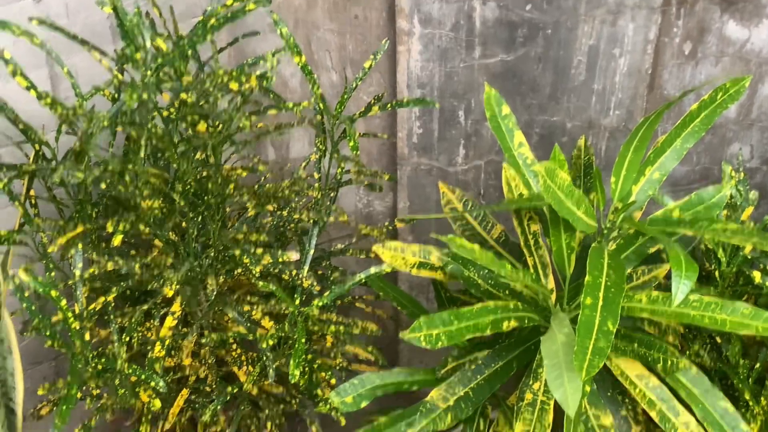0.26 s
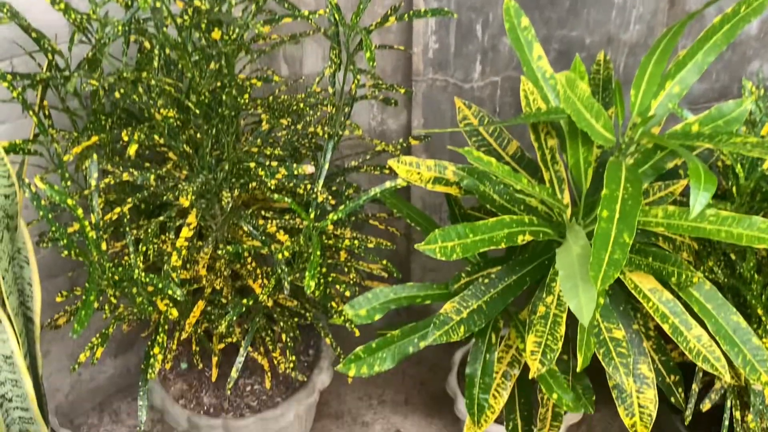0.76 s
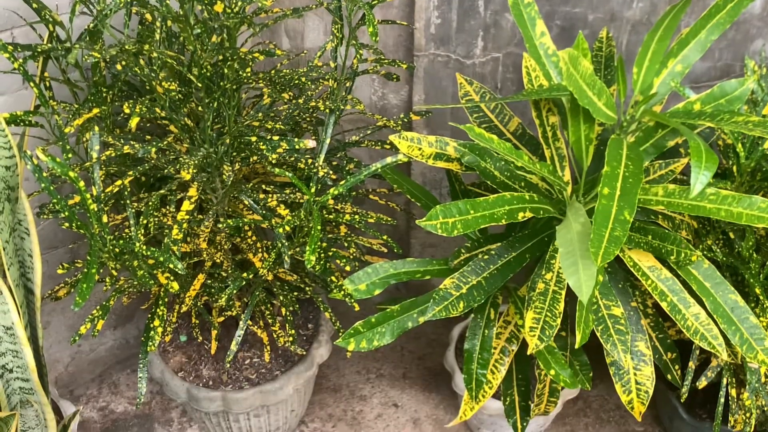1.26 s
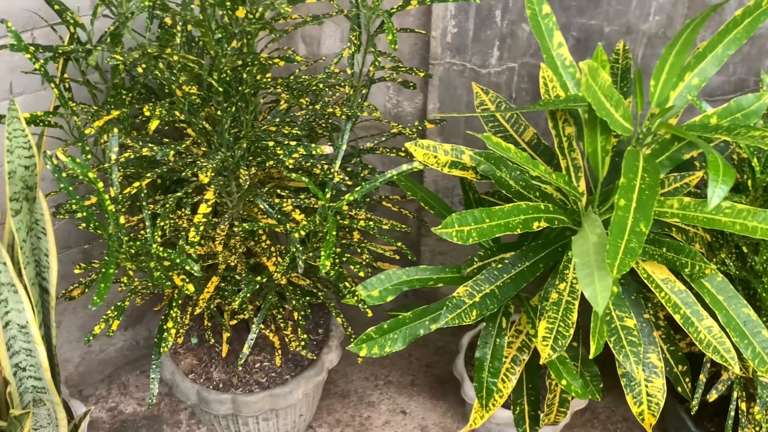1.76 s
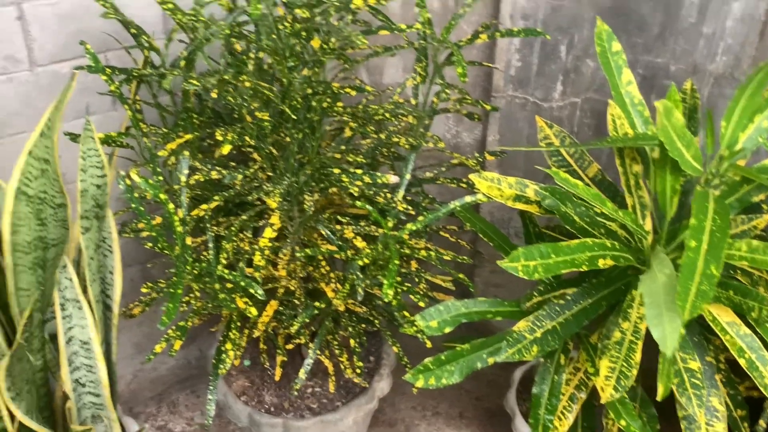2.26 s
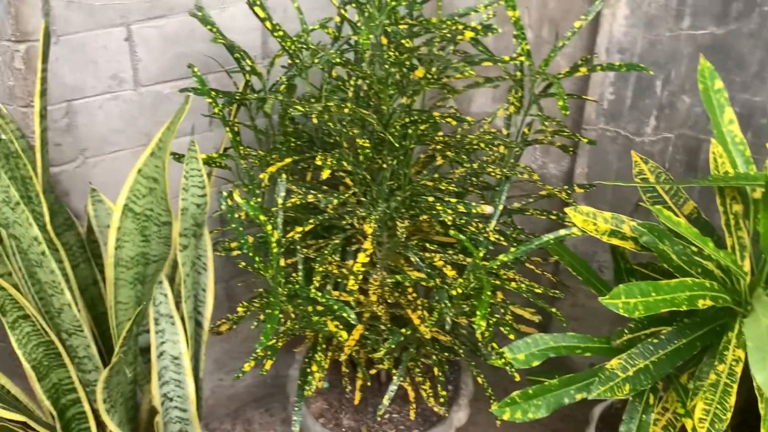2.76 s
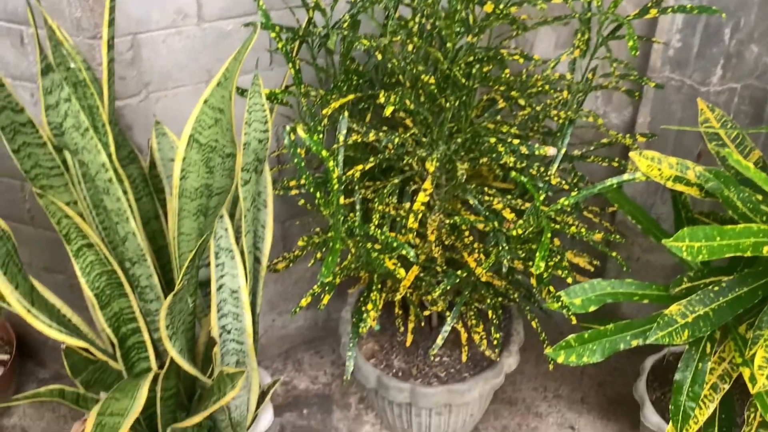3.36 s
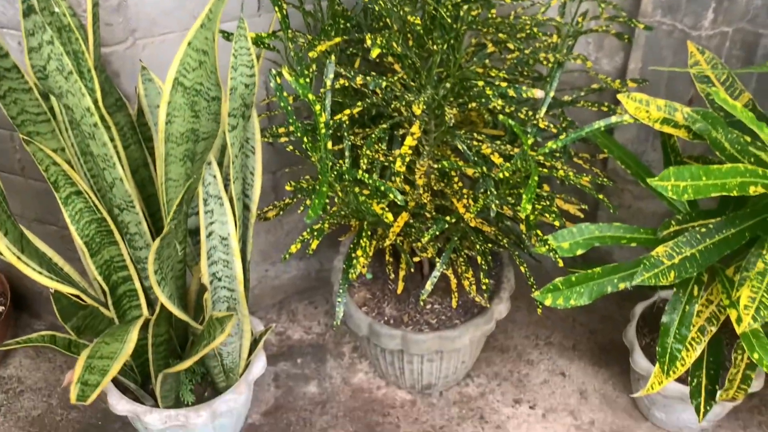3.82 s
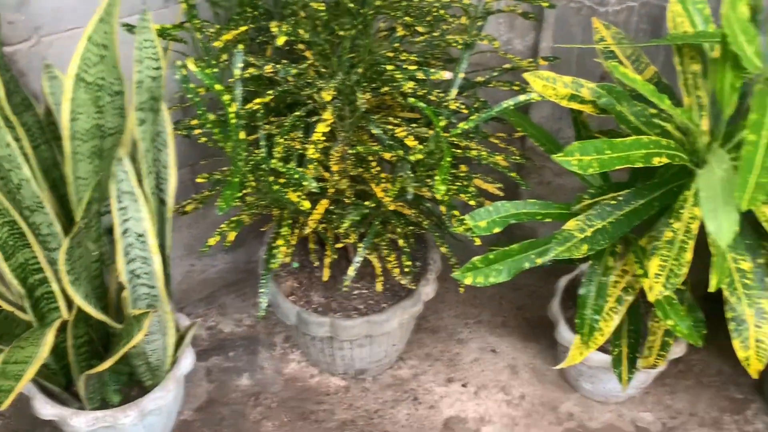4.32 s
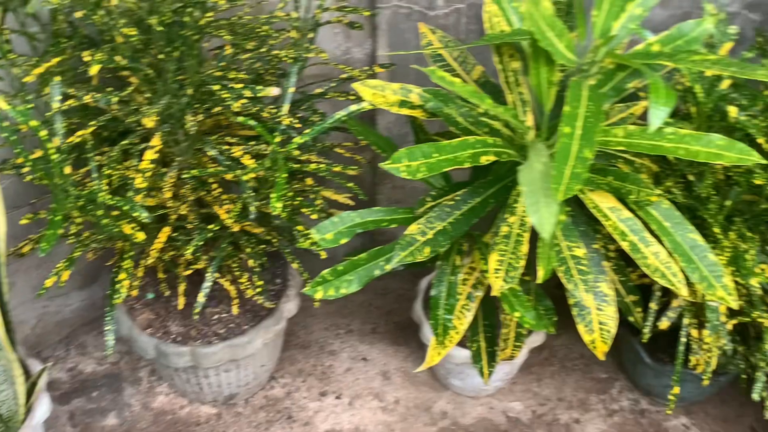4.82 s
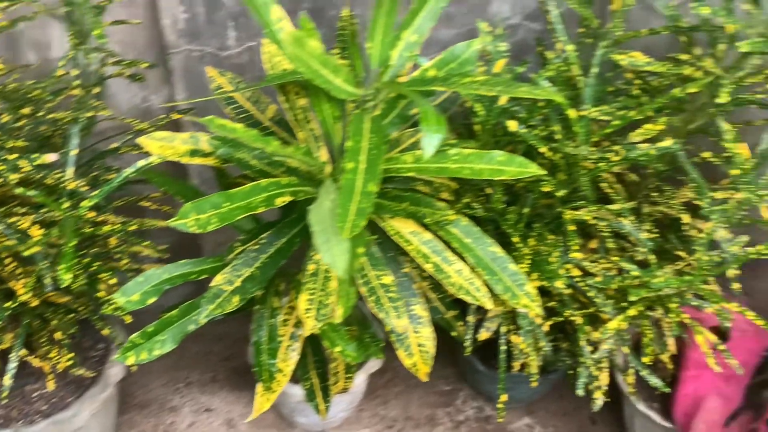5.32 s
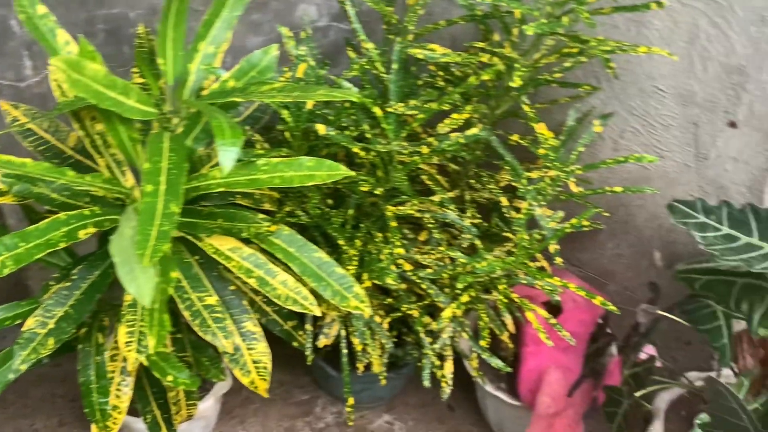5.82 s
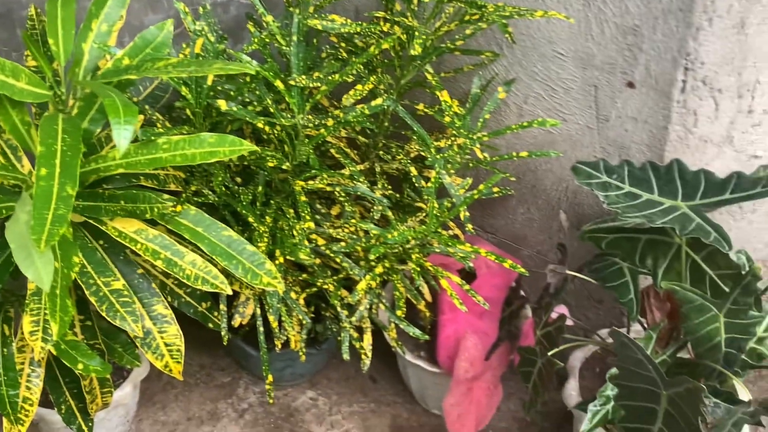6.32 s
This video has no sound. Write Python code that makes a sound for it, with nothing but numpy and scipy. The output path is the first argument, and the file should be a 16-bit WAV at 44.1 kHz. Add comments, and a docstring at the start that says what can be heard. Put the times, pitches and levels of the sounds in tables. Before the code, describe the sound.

Close outdoor perspective beside a wall and plants. Rain pours steadily, with countless small plops and light ticks. Heavy drops strike very near, each a sharp slap, hollow knock, short ping and falling low thud, some scattering droplets. The loudest briefly duck the rain. Later hits are fewer and softer, leaving mostly patter.

```python
"""A yard in heavy rain, heard from beside a wall with potted plants.
Far rain is a wash of shaped noise; nearer drops are short rings that patter on leaves and paving.
Light drops tick as brief bursts of noise. Big drips land right by the microphone, some splattering
into fragments: a sharp slap, a knock and ping, a falling thud and scattered droplets.
A limiter briefly turns everything down at the loud hits, so they duck the rain."""
import sys
import numpy as np
from scipy import signal
from scipy.fft import rfft, irfft
from scipy.io import wavfile
from scipy.ndimage import uniform_filter1d, minimum_filter1d

SR = 44100
rng = np.random.default_rng(int(sys.argv[2]) if len(sys.argv) > 2 else 0)


def to_wav(sig):
    """Store sig (one row per channel, or 1-D mono) as 16-bit WAV at the path in sys.argv[1].

    Samples outside -1..1 are clipped; the rate is SR.
    """
    pcm = np.clip(np.atleast_2d(sig), -1, 1) * 32767
    pcm = np.round(pcm).astype(np.int16)
    wavfile.write(sys.argv[1], SR, pcm.T)  # frames by channels


N = 290173  # length in samples


def amp(db):
    """Turns decibels into gain."""
    return 10 ** (np.asarray(db) / 20)


def unit(x):
    """Scales a sound to rms 1."""
    return x / np.sqrt(np.mean(x ** 2) + 1e-20)


def colour(points, hz):
    """Reads the gain at each pitch from a colour table, joined on a log-frequency axis."""
    point_hz, point_db = np.transpose(points)
    return amp(np.interp(np.log(hz + 1), np.log(point_hz), point_db))


def shaped(x, points):
    """Gives a sound the colour of a table, at rms 1."""
    gain = colour(points, np.fft.rfftfreq(N, 1 / SR))
    return unit(irfft(rfft(x) * gain, N))


def add(mix, start_s, sound):
    """Mixes a sound in at a given time."""
    start = max(round(start_s * SR), 0)
    part = mix[start:][:len(sound)]
    part += sound[:len(part)]


def resonance(hz, centre_hz, q):
    """Frequency response of one damped resonance, gain 1 at its centre."""
    return 1 / (1 + 1j * q * (hz / centre_hz - centre_hz / (hz + 1e-6)))


# How strong the rain is over time: time_s, level_db
RAIN_STRENGTH = [(0.0, -34), (0.24, -33.5), (0.62, -32), (1.67, -34), (2.36, -34), (2.95, -35), (4.31, -41),
                 (5.0, -39.5), (5.44, -39.5), (6.58, -36)]


def rain_db(s):
    """Strength of the rain at time s; wash, hiss and stray light drops all follow it."""
    return np.interp(s, *np.transpose(RAIN_STRENGTH))


def patter(per_s, spread_db, low_hz, high_hz, cycles, count=28):
    """Countless drops of random size, each a short ring at the pitch of the spot it hits."""
    chance = rng.random(N)
    size = np.minimum(rng.exponential(1, N), 5)
    spot = rng.integers(0, count, N)
    hits = (chance < per_s / SR) * amp(spread_db * size) * rng.choice([-1, 1], N)
    t, out = np.arange(512) / SR, np.zeros(N)
    for k, hz in enumerate(np.geomspace(low_hz, high_hz, count)):
        ring = np.sin(2 * np.pi * hz * t) * np.exp(-hz * t / cycles)  # fades over the given cycles
        out += signal.oaconvolve(hits * (spot == k), unit(ring))[:N]
    return unit(out)


# Colour of the low wash of rain: pitch_hz, level_db (per Hz, relative)
WASH_COLOUR = [(25, -19), (45, 3), (80, -2.5), (150, -3.5), (260, -3.5), (450, 0.5), (830, -1.5),
               (1150, -4.5), (1600, -7), (2200, -3.5), (2700, -10.5), (3400, -14), (4600, -27.5),
               (7000, -43)]
# Colour of the high hiss of rain: pitch_hz, level_db (per Hz, relative)
HISS_COLOUR = [(1500, -8.5), (3000, 1), (4000, 5.5), (4800, -1), (5700, 2.5), (7200, -2.5), (8400, -11.5),
               (9500, -20), (10500, -8.5), (11500, -15.5), (13500, -21), (15500, -49), (16500, -36)]


def rain(wash_db=-0.45, hiss_db=-16.5, plops_db=-5, fizz_db=-4, ticks_db=-38):
    """Far drops merge into noise; nearer ones are plops on the ground, fizz and fine ticks on leaves."""
    far_wash, far_hiss = rng.standard_normal((2, N))
    plops = patter(per_s=1000, spread_db=3.0, low_hz=780, high_hz=4420, cycles=2.9)
    fizz = patter(per_s=890, spread_db=1.5, low_hz=5470, high_hz=15000, cycles=0.47)
    ticks = patter(per_s=70, spread_db=2.5, low_hz=11000, high_hz=15600, cycles=2.4, count=10)
    wash = unit(shaped(far_wash, WASH_COLOUR) + amp(plops_db) * shaped(plops, WASH_COLOUR))
    hiss = unit(shaped(far_hiss, HISS_COLOUR) + amp(fizz_db) * shaped(fizz, HISS_COLOUR))
    layers = amp(wash_db) * wash + amp(hiss_db) * hiss + amp(ticks_db) * ticks
    return amp(rain_db(np.arange(N) / SR)) * layers


# Stray light drops: how often, level relative to the rain, and range of pitch
TAPS_PER_S, TAP_DB, TAP_SPREAD_DB = 18, -11.5, 1
TAP_LOW_HZ, TAP_HIGH_HZ = 3000, 6000


def stray_taps(count=200):
    """Light drops at random moments, levels and pitches: rows of start_s, level_db, centre_hz."""
    wait, weight, spot = rng.random((count, 3)).T
    start_s = np.cumsum(-np.log(1 - wait)) / TAPS_PER_S  # random waits, as in steady rain
    level_db = rain_db(start_s) + TAP_DB + TAP_SPREAD_DB * (2 * weight - 1)
    centre_hz = TAP_LOW_HZ * (TAP_HIGH_HZ / TAP_LOW_HZ) ** spot
    return [row for row in zip(start_s, level_db, centre_hz) if row[0] < N / SR]


# Ticks of light drops; those near 13 kHz are the treble tick of a big drip:
# start_s, level_db (before the level shared by all taps), centre_hz
TIMED_TAPS = [(.1825, -44, 13200), (.572, -40, 5000), (0.7317, -22.5, 5770), (.8593, -25.5, 3800),
              (0.9377, -39.5, 4060), (1.106, -31, 13100), (1.328, -39, 5760), (1.6715, -41, 6400),
              (2.015, -43, 7000), (2.201, -46, 7000), (2.744, -43, 6400), (4.5376, -49, 8450),
              (4.9968, -38, 4000), (6.399, -47, 8400)]


def taps(level_db=-1, snap_s=0.0017, spray_db=-19, spray_s=0.027, octaves=0.53, size=2048):
    """A tick snaps and leaves a little spray: one burst of noise with a fast and a slow fade."""
    out, t, hz = np.zeros(N), np.arange(size) / SR, np.fft.rfftfreq(size, 1 / SR)
    for start_s, tap_db, centre_hz in TIMED_TAPS + stray_taps():
        octaves_away = np.log2((hz + 1) / centre_hz)
        band = np.exp(-.5 * (octaves_away / octaves) ** 2) / (1 + hz / centre_hz)
        noise = irfft(rfft(rng.standard_normal(size)) * band)
        tap = noise * (np.exp(-t / snap_s) + amp(spray_db) * np.exp(-t / spray_s))
        first_moment = tap[:size // 32].std()  # the level is set on the snap
        add(out, start_s, amp(tap_db + level_db) * tap / first_moment)
    return out


def droplets(hz, fade_s, gap_s=.0034, spread_db=4, click_db=-1, click_hz=2500, click_q=0.086,
             click_fade=0.64, plop_db=6.0, plop_hz=720, plop_octaves=1.0, plop_q=3.3, count=10):
    """Spectrum of the droplets after a splash: each clicks and plops, and the clicks die away sooner."""
    when, weight, side, spot = rng.random((count, 4)).T[:, :, None]
    delay_s = np.maximum(np.arange(count)[:, None] + when - .5, 0) * gap_s
    sizes = np.sign(side - .5) * amp(spread_db * (2 * weight - 2.5))
    click_level = amp(click_db) * np.exp(-delay_s / fade_s / click_fade)
    click = click_level * resonance(hz, click_hz, click_q)
    spot_hz = plop_hz * 2 ** (plop_octaves * (2 * spot - 1))
    plop = amp(plop_db) * np.exp(-delay_s / fade_s) * resonance(hz, spot_hz, plop_q)
    return (sizes * (click + plop) * np.exp(-2j * np.pi * delay_s * hz)).sum(0)


SLAP_HZ, SLAP_DB_PER_OCTAVE = 4000, 9  # brightness of a 0 dB slap; a harder one is duller
SLAP_LOW_HZ = 186  # a slap is too brief to carry bass
THUD_LAG_CYCLES = 0.689  # the thud follows the slap by this share of its own period
SPRAY_FADE_S = 0.025  # how long a 0 dB spray lingers; a weaker one ends sooner
# each hit lands in two parts: size and range of delay of the second
SECOND_SHARE, SECOND_EARLY_S, SECOND_LATE_S = 0.29, 0.001166, 0.00407

# Colour shared by all big drips: pitch_hz, level_db (relative)
SPLASH_COLOUR = [(25, 0), (60, -1), (140, -0.85), (200, 4), (700, -5.5), (1300, -8.5), (2100, -9),
                 (3300, -13.5), (4700, -22), (5800, -17.5), (7200, -23), (9000, -32.5), (10500, -26.5),
                 (15000, -36.5)]
# Big drips, and the fragments of two that splatter; each row has its own thud, knock and ping.
# Levels are before the shared colour and level:
# start_s, slap_db, thud_db, thud_hz, knock_db, knock_hz, ping_db, ping_hz, spray_db
BIG_DRIPS = [ (0.183, -15, -9, 310, 3, 514, 3, 770, -14), (0.5217, -8.5, -28, 500, -8, 1160, 4.5, 7000, -6),
             (0.5312, -15.5, -10, 350, 0.5, 790, -10, 2400, -8),
             (0.5467, -29, -5.5, 375, -1, 766, -22, 1500, -7),
             (0.6621, -10, -12, 506, 4.5, 850, 8, 2240, -17),
             (0.6677, -5, 1, 326, 3.5, 1220, 1.5, 6200, -7),
             (0.6798, -17, -1, 380, -1, 810, -13, 3200, -18),
             (0.7119, 4, 23.5, 171, 17.5, 780, 17, 2030, -3),
             (0.9281, -18, -29, 600, -10, 1700, -13, 3150, -16),
             (0.9524, -23, -5.5, 283, -2.5, 445, 4.5, 870, -35),
             (1.1028, 4.5, 9, 310, -6, 455, 9.5, 1930, -7.5), (1.1723, 3, 15, 179, 10, 705, 11.5, 1810, -9),
             (1.6304, 6, 17, 189, 13.5, 644, 17.5, 3060, -31),
             (2.1315, 7, 15, 124, 9.5, 665, 11, 3000, -9.5),
             (2.428, -36, -13.5, 195, -28, 302, -11, 2210, -36),
             (2.653, 11, 21.5, 248, 21, 776, 15.5, 2020, -38),
             (3.202, 21.5, 9.5, 245, 17, 655, 4.5, 2340, -44),
             (3.7616, -9.5, 5, 264, 10.5, 570, -7, 1060, -32),
             (3.836, 22, 11.5, 283, 25.5, 570, 12, 1000, -48),
             (3.9505, -28, -24, 605, -4, 480, -8.5, 990, -40),
             (4.2482, -25, 6.5, 101.6, 1, 272, -3.5, 725, -35),
             (4.7245, -21.5, 13.5, 103, 8, 310, -0.5, 880, -26),
             (5.1556, 0, 12, 117.7, -8, 740, -0.5, 1940, -23),
             (5.506, -41, -35, 500, -30, 550, -11.5, 1130, -43)]


def drips(level_db=26, sweep_turns=1.2, sweep_end_hz=11.4, boom_hz=97, boom=0.69, boom_q=2.9,
          knock_q=3.35, ping_q=6.0, thud_q=0.53, echo=0.19, echo_s=0.00093, size=8192):
    """First contact slaps, the spot knocks and pings, the bulk of the water thuds, droplets scatter."""
    out, hz = np.zeros(N), np.fft.rfftfreq(size, 1 / SR)
    lead_s = .008  # room before the hit
    # low notes arrive last, after sweep_turns / (hz + sweep_end_hz) seconds,
    # so each hit sweeps down into a short boom
    sweep = np.exp(-2j * np.pi * (sweep_turns * np.log(1 + hz / sweep_end_hz) + hz * lead_s))
    boomy = 1 + boom * resonance(hz, boom_hz, boom_q)
    body = amp(level_db) * colour(SPLASH_COLOUR, hz) * sweep * boomy
    # a quick echo off the wall follows the thud and hollows out its colour
    wall_echo = (1 + echo * np.exp(-2j * np.pi * hz * echo_s)) / (1 + echo / 2)
    for start_s, slap_db, thud_db, thud_hz, knock_db, knock_hz, ping_db, ping_hz, spray_db in BIG_DRIPS:
        bright_hz = SLAP_HZ / 2 ** (slap_db / SLAP_DB_PER_OCTAVE)
        slap = amp(slap_db) * hz / (hz - 1j * SLAP_LOW_HZ) / (1 + 1j * hz / bright_hz) ** 2
        late = np.exp(-2j * np.pi * hz * THUD_LAG_CYCLES / thud_hz)
        thud = amp(thud_db) * late * wall_echo * resonance(hz, thud_hz, thud_q) ** 2
        knock = amp(knock_db) * resonance(hz, knock_hz, knock_q)
        ping = amp(ping_db) * resonance(hz, ping_hz, ping_q)
        spray = amp(spray_db) * droplets(hz, SPRAY_FADE_S * amp(spray_db))
        second_delay_s = rng.uniform(SECOND_EARLY_S, SECOND_LATE_S)
        second = SECOND_SHARE * np.exp(-2j * np.pi * hz * second_delay_s)
        contact = (slap + knock + ping) * (1 + second)
        add(out, start_s - lead_s, irfft(body * (contact + thud + spray)))
    return out


def scene():
    """Rain all round, drips at the microphone, light taps nearby."""
    return (rain() + drips() + taps())[None]


def limiter(x, release_s=0.014, hold_size=530, ahead_size=22):
    """Turns down just ahead of each peak, holds for a moment, then lets go; sizes are in samples."""
    ceiling = .63
    needed = np.minimum(1, ceiling / (abs(x) + 1e-9))
    cut = 1 - minimum_filter1d(needed, hold_size, origin=hold_size // 2 - ahead_size)
    # the cut may rise at once but dies away only at the release rate
    fall = np.arange(N) / SR / release_s
    cut = np.exp(np.maximum.accumulate(np.log(cut + 1e-9) + fall) - fall)
    return x * (1 - uniform_filter1d(cut, ahead_size))


def record(dry):
    """The limiter tames the peaks, then a low-pass removes the very top of the treble."""
    edge_hz = 16300
    low_pass = signal.firwin(255, edge_hz, window=("kaiser", 9), fs=SR)
    return signal.oaconvolve(limiter(dry[0]), low_pass, "same")[None]


dry = scene()
out = record(dry)
to_wav(out)
```